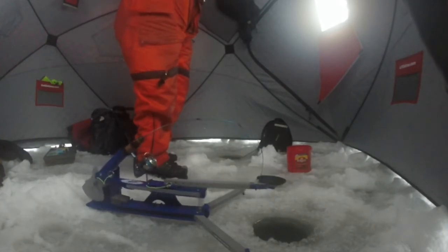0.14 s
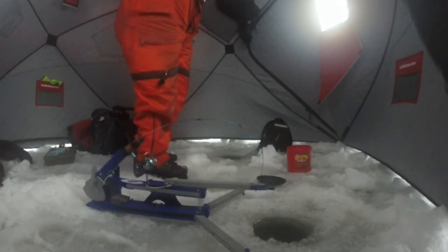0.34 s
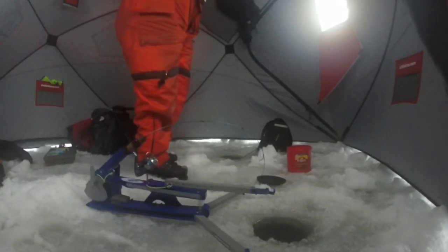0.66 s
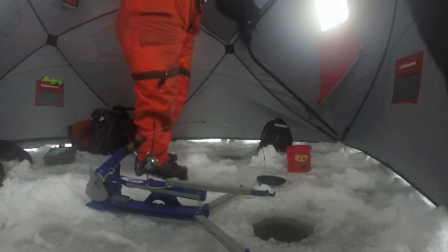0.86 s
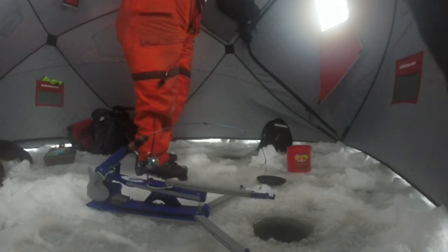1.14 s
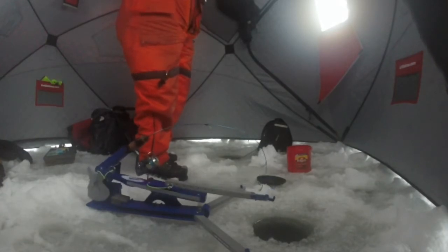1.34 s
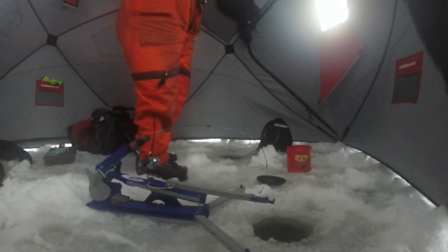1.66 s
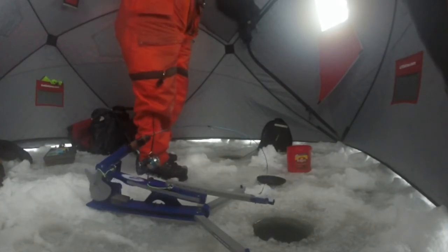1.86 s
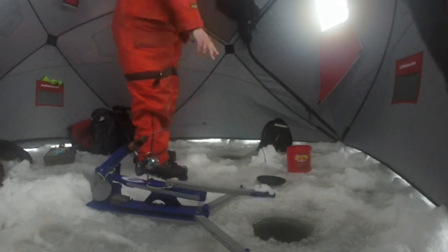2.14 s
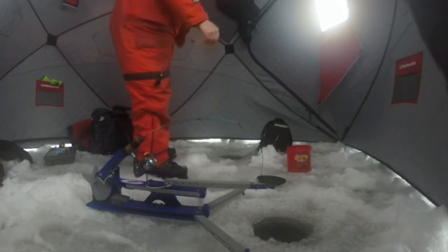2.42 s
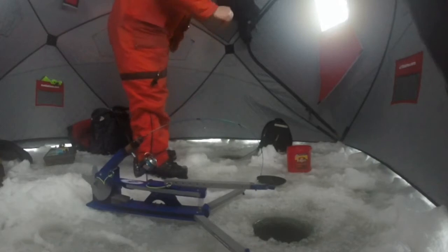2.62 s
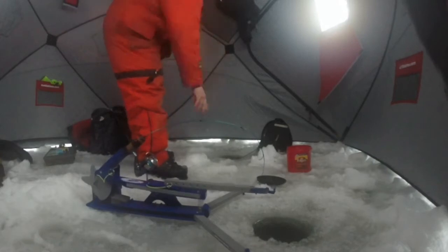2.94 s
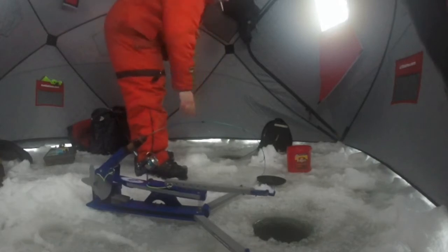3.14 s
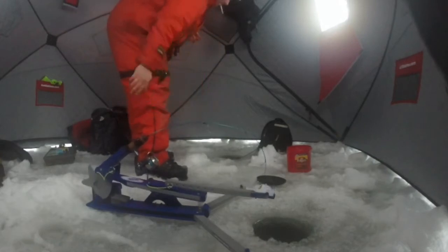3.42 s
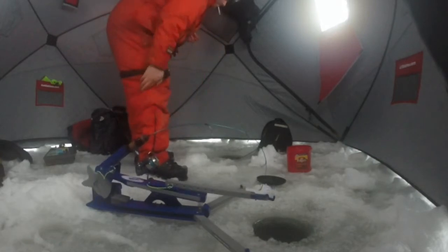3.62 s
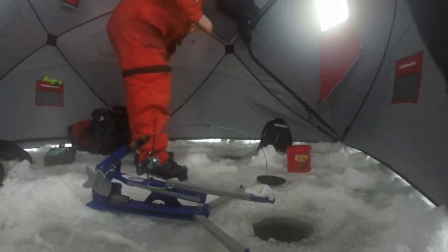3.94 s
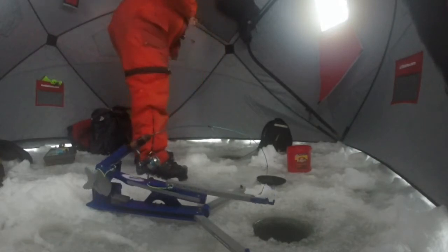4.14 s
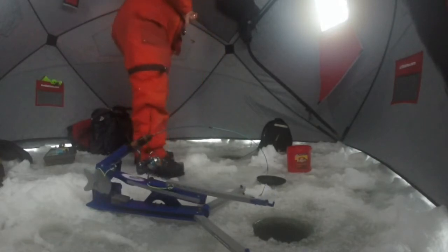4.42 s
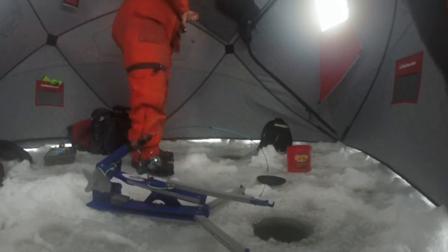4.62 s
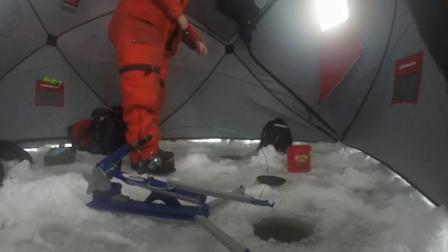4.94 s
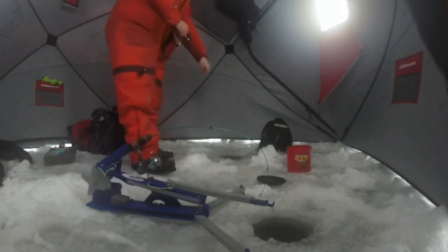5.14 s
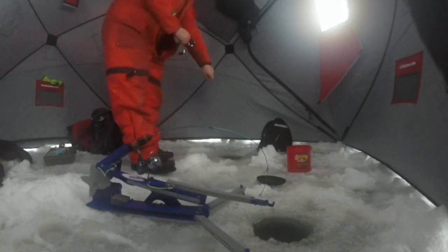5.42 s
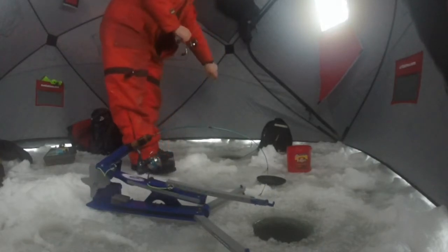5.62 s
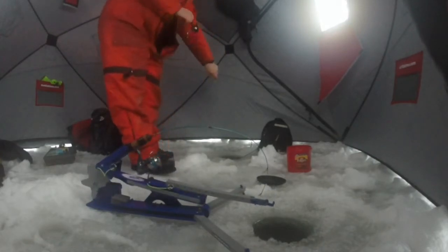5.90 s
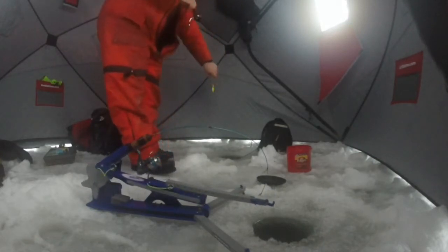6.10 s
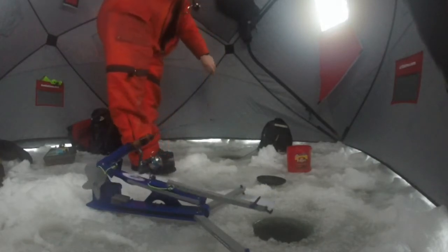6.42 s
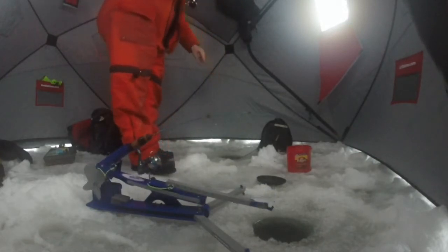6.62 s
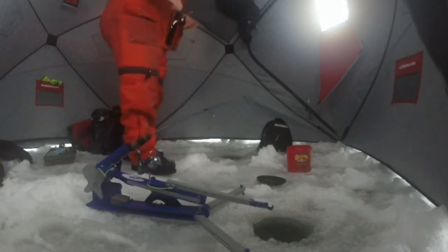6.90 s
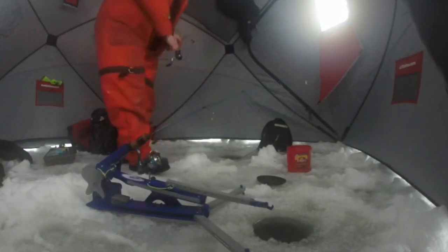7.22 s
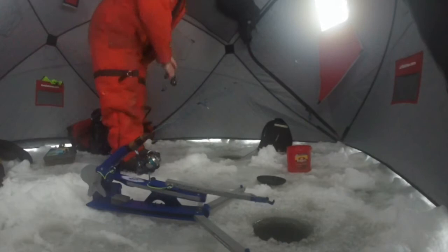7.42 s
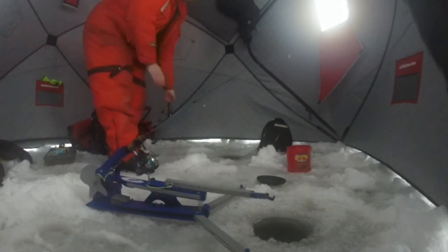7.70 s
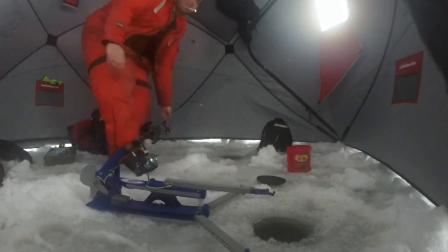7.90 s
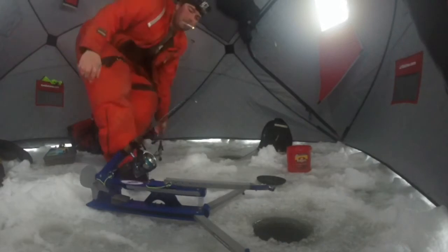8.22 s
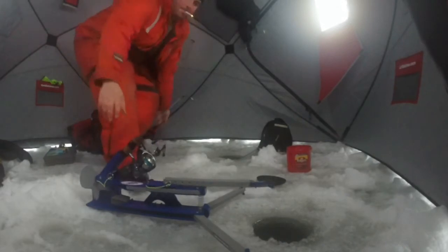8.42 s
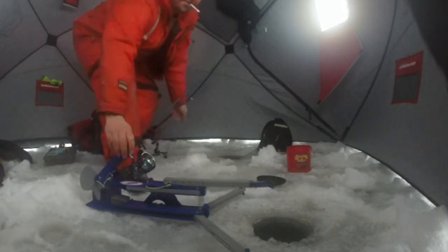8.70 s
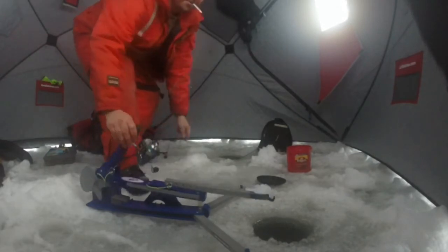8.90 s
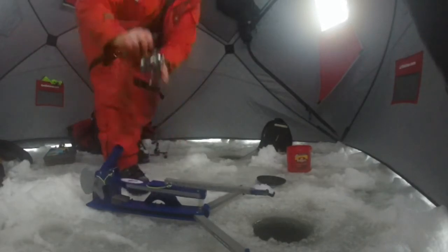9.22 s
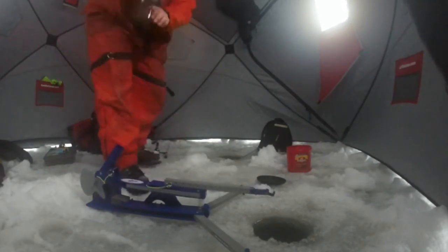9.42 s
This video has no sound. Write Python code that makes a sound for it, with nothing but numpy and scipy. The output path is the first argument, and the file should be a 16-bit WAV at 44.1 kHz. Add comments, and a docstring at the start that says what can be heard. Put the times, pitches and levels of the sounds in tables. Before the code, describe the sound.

Steady rain patters on the taut cloth of a small shelter on ice, a soft broad hiss with fine drops, fluttering slightly and holding nearly level throughout. For 0-2.9 s it is almost alone, with scattered crisp ticks, densest in the first half second. From 2.9 to 3.9 s nylon rubs and slush crunches lightly, ending in low heel booms near 3.8 s. Rain and ticks return. At 6.4 s hard plastic clatters suddenly, with a strong hollow knock at 6.5 s and smaller rattles to 6.7 s. Boots thud and crush slush around 7.0-7.9 s; the suit swishes, sharp snaps hit at 7.6 and 7.9 s, and a very faint high metal ring shimmers. Steps thump at 8.15 s, a knock follows at 8.4 s, then crunching and rustling at 8.5-8.9 s. Hollow plastic clacks land at 9.1 and 9.4 s. Close, dry sound, short soft tail.

```python
"""Steady rain patters on the taut fabric of a small shelter on ice: filtered noise, random grains, ticks.
Hollow knocks sound (decaying modes); boots crush slush, a nylon suit swishes, low thuds fall
(coloured grains under swelling gains); heels boom (decaying sines). Later plastic rattles (chatter
through ringing modes) and a thin metal part rings faintly (beating sines)."""
import sys
import numpy as np
from scipy import signal
from scipy.io import wavfile
from scipy.ndimage import uniform_filter1d

SR = 44100
rng = np.random.default_rng(int(sys.argv[2]) if len(sys.argv) > 2 else 0)


def field_ratio(decibels):
    """Amplitude ratio for a level in dB (20 dB per decade); scalars and array-likes work."""
    return 10 ** (np.asarray(decibels, dtype=float) / 20)


def master(y):
    """Save y as 16-bit WAV."""
    cut = np.clip(np.atleast_2d(y).T, -1, 1)
    pcm = np.round(cut * 32767)  # scale
    wavfile.write(sys.argv[1], SR, pcm.astype(np.int16))


N = 421155
GRID_HZ = np.geomspace(30, 20000, 20)


def evened(x):
    """Scales to rms 1."""
    return x / np.sqrt(np.mean(x ** 2) + 1e-20)


def read(points, hz):
    """Reads a spectrum on a log-frequency axis."""
    point_hz, value = np.transpose(points)
    return np.interp(np.log(hz + 1), np.log(point_hz + 1), value)


def hump(hz, centre_hz, octaves):
    """Bump on the octave scale [dB], down 6 dB at the given octaves from its centre."""
    return -6 * (np.log2((hz + 1) / centre_hz) / octaves) ** 2


def add(mix, start_s, sound):
    """Mixes a sound in at its start time."""
    part = mix[round(start_s * SR):][:len(sound)]
    part += sound[:len(part)]


def coloured(x, points, size=4096):
    """Causal minimum-phase filter with the given spectrum: clicks keep a sharp front."""
    log_gain = np.log(field_ratio(read(points, abs(np.fft.fftfreq(size, 1 / SR)))))
    taps = np.fft.ifft(np.exp(np.conj(signal.hilbert(log_gain)))).real[:size // 2]
    return signal.oaconvolve(x, taps)[:len(x)]


def grains(count, per_s, spread_db, t60_s):
    """Random impacts, a few much larger than the rest, each a short dying puff of noise."""
    size = field_ratio(spread_db * np.minimum(rng.exponential(1, count), 4))
    size *= rng.random(count) < per_s / SR
    fade = field_ratio(-2 * 60 / (max(t60_s, 1e-4) * SR))  # per sample, of power
    envelope = np.sqrt(signal.lfilter([1], [1, -fade], size ** 2))
    return evened(envelope * rng.standard_normal(count))


def wander(seconds):
    """Smooth random drift of rms 1, over the given time: noise averaged twice."""
    width = max(round(seconds * SR), 2)
    return evened(uniform_filter1d(uniform_filter1d(rng.standard_normal(N), width), width))


def bouts(rows):
    """Gain of events that swell to a peak and fade, adding as powers."""
    t, power = np.arange(0, N, 32) / SR, 0
    for peak_s, db, swell_s, fade_s in rows:
        distance = np.maximum((peak_s - t) / max(swell_s, 1e-3), (t - peak_s) / max(fade_s, 1e-3))
        power = power + field_ratio(2 * (db - 20 * distance))
    return np.interp(np.arange(N) / SR, t, np.sqrt(power))


# strength of the shower: (time [s], level [dB])
SHOWER = [(0, -41.5), (.7, -42), (2.3, -42.5), (3.1, -43), (4.6, -42.5), (5.4, -43.1), (6.2, -43.5),
          (7, -42.6), (8.1, -43.5), (9.55, -42)]
# colour of rain on the cloth: (frequency [Hz], density [dB per Hz])
RAIN_COLOUR = [(15, -39), (25, 0), (48, 0.5), (241, -5), (437, 0), (572, -1), (620, -2.5), (834, -2.5),
               (1040, -5), (1820, -2.5), (4450, -2.5), (6140, -6.5), (13400, -23.5), (15800, -28)]
# patches of cloth, the last one sparse and crisp: (centre [Hz], level [dB], drops [per s], t60 [s])
PATCHES = [(430, -1.5, 90, 0.039), (1890, -1, 400, 0.016), (4480, -1.5, 420, 0.015),
           (11000, -1.5, 320, 0.016), (3630, -13.5, 44, 0.001)]


def rain():
    """Far drops merge to a hiss; nearer ones patter apart, each patch of cloth at its own pitch."""
    time_s, shower_db = np.transpose(SHOWER)
    flutter = field_ratio(2.1 * np.tanh(wander(.026)))  # quick and random, by up to 2.1 dB
    patter = np.zeros(N)
    for centre_hz, db, per_s, t60_s in PATCHES:
        patch = np.transpose([GRID_HZ, np.maximum(hump(GRID_HZ, centre_hz, octaves=1.0), -60)])
        patter += field_ratio(db) * coloured(grains(N, per_s, 3.5, t60_s), patch)
    hiss = field_ratio(0.5) * rng.standard_normal(N)
    cloth = evened(coloured(hiss + patter * flutter, RAIN_COLOUR))
    return cloth * field_ratio(np.interp(np.arange(N) / SR, time_s, shower_db) + .5 * wander(0.025))


# sharp ticks, large drops or snaps: (time [s], peak [dB], pitch [Hz])
TICKS = [(0.015, -26, 2900), (0.167, -24.5, 3940), (0.208, -24, 4410), (0.267, -26, 3000),
         (0.3904, -24, 4140), (0.5233, -25, 3220), (0.9875, -26, 3350), (1.04, -25, 1490),
         (1.0653, -29, 900), (1.7549, -25, 4880), (2.217, -32, 480), (2.3436, -27, 4000),
         (2.3876, -24.5, 3200), (2.621, -26, 2750), (2.7498, -30, 1670), (3.247, -32, 2200),
         (3.689, -28, 3340), (4.3703, -22, 3320), (4.6241, -26, 3300), (4.68, -25, 2800),
         (4.887, -29, 4000), (5.1655, -30, 3300), (5.315, -30, 3000), (5.418, -29, 1750),
         (5.9748, -26.5, 2800), (7.4883, -30, 4800), (7.5962, -19, 4300), (7.8682, -20, 4150),
         (8.353, -27.5, 4000), (8.882, -27, 2900), (8.947, -28, 3800)]


def ticks():
    """A large drop or a snap is a sharp tick, with a brief spatter at its own pitch."""
    out, t = np.zeros(N), np.arange(1500) / SR
    spatter_t60_s = .016
    for start_s, db, hz in TICKS:
        spot = read(RAIN_COLOUR, GRID_HZ) + np.maximum(hump(GRID_HZ, hz, octaves=1.14), -40)
        spatter = 0.18 * rng.standard_normal(len(t)) * field_ratio(-60 * t / spatter_t60_s)
        tick = coloured((t == 0) + spatter, np.transpose([GRID_HZ, spot]))
        add(out, start_s, field_ratio(db) * tick / abs(tick).max())
    return out


# hollow knocks; the first, at 0.294 s, is a drop on slack cloth:
# (time [s], level [dB], main mode [Hz], t60 [s])
KNOCKS = [(0.294, -38, 420, 0.048), (3.228, -36, 1160, .03), (6.521, -15, 328, 0.016),
          (6.541, -22.5, 460, 0.017), (6.633, -27, 325, 0.039), (6.643, -24, 400, 0.018),
          (7.405, -33, 384, 0.053), (7.604, -31, 345, 0.085), (7.918, -33, 430, 0.067),
          (7.929, -31.5, 436, 0.08), (8.3793, -23, 383, 0.032), (9.1, -16, 382, 0.018),
          (9.121, -27, 422, 0.032), (9.385, -20.5, 390, 0.029)]
# modes of a hollow knock: (multiple of the main mode, level [dB])
HOLLOW = [(.8, -9), (1.001, 18.5), (1.2, 6.5), (1.38, -9)]


def knocks():
    """A hollow knock, or a drop on slack cloth, rings in a few close modes with a buzz after them."""
    out, t = np.zeros(N), np.arange(SR // 4) / SR
    for start_s, db, hz, t60_s in KNOCKS:
        ring = sum(field_ratio(mode_db) * np.sin(2 * np.pi * hz * k * t) for k, mode_db in HOLLOW)
        ring *= field_ratio(-60 * t / max(t60_s, .01)) * np.minimum(t / 0.0026, 1)
        buzz = rng.standard_normal(len(t)) * field_ratio(-60 * t / 0.2) * (t > .004)
        buzz /= np.linalg.norm(buzz)
        knock = ring + field_ratio(-8.5) * signal.fftconvolve(ring, buzz)[:len(t)]
        add(out, start_s, field_ratio(db) * knock / abs(ring).max())
    no_bass = signal.butter(4, 265, "high", fs=SR, output="sos")  # small bodies have no deep bass
    return signal.sosfilt(no_bass, out)


# slush crushed under a sole: (peak time [s], level [dB], 20 dB swell [s], 20 dB fade [s])
CRUSHES = [(2.95, -49, 0.31, 0.59), (3.234, -42, 0.022, 0.035), (3.356, -41.5, .015, .07),
           (3.626, -47, 0.25, .03), (3.735, -42.5, 0.037, 0.16), (3.814, -40, 0.15, 0.053),
           (7.028, -37.5, 0.02, 0.069), (7.16, -48, .4, 0.69), (7.315, -42, .02, 0.032),
           (7.402, -38.5, 0.024, 0.27), (7.604, -37, 0.037, 0.1), (7.796, -44.5, .08, 0.36),
           (8.14, -39.5, 0.0036, .04), (8.168, -37.5, 0.017, 0.08), (8.208, -41, .02, .05),
           (8.382, -41, 0.03, 0.17), (8.532, -45, 0.22, 0.12), (8.645, -44, .02, .1),
           (8.669, -37, 0.014, 0.03), (8.695, -41, .02, .03), (8.736, -37, .04, .015),
           (8.8, -35.5, .1, 0.18), (8.84, -37.5, 0.11, 0.065), (9.104, -40, 0.016, 0.23),
           (9.384, -42, 0.007, 0.32)]
# colour of crushed slush: (frequency [Hz], gain [dB])
CRUNCH_COLOUR = [(300, -18), (1000, -17), (1300, -5), (1550, -4), (1850, -4), (2300, -14.5), (3200, -10.5),
                 (5000, -25.5), (9000, -33)]


def slush():
    """Slush crushes under the soles in dense grains."""
    crunch = grains(N, per_s=1300, spread_db=2.2, t60_s=.012)
    return bouts(CRUSHES) * evened(coloured(crunch, CRUNCH_COLOUR))


# nylon rubbing on nylon: (peak time [s], level [dB], 20 dB swell [s], 20 dB fade [s])
RUBS = [(2.962, -46, 0.26, 0.29), (3.228, -45, 0.06, .35), (3.385, -45, 0.14, 0.11),
        (3.814, -38, 0.32, 0.06), (7.028, -45, .04, 0.11), (7.385, -39, 0.28, 0.28),
        (7.566, -37.5, 0.021, .055), (7.604, -35.5, 0.023, 0.13), (7.85, -46.5, 0.6, 0.36),
        (8.14, -42.5, .01, 0.55), (8.603, -35, .025, 0.022), (8.668, -42.5, 0.18, 0.11),
        (8.834, -39, 0.069, 0.098), (9.296, -41, 0.077, 0.052), (9.49, -47.5, 0.51, .5)]
# colour of rubbed nylon: (frequency [Hz], gain [dB])
SWISH_COLOUR = [(500, 0), (2000, -2.5), (5000, -1.5), (9000, -10), (12000, -12), (16000, -21)]


def nylon():
    """Nylon rubs on nylon in fine grains that blur to a swish."""
    swish = grains(N, per_s=1600, spread_db=2.6, t60_s=0.012)
    return bouts(RUBS) * evened(coloured(swish, SWISH_COLOUR))


# low thuds: weight on the boots, and the low body of the rattle's first strike:
# (peak time [s], level [dB], 20 dB swell [s], 20 dB fade [s])
THUDS = [(2.962, -50.5, .08, 0.51), (3.63, -45.5, 0.089, 0.078), (3.77, -42, 0.11, 0.1),
         (3.82, -42, 0.1, 0.064), (6.39, -42, 0.013, 0.26), (6.64, -38, 0.046, 0.073),
         (6.75, -45.5, 0.052, 0.048), (7.028, -36.5, 0.037, 0.036), (7.102, -45.5, 0.04, 0.29),
         (7.566, -42.5, 0.081, .1), (7.604, -38, 0.077, 0.043), (8.15, -42, .02, .1),
         (8.532, -46, 0.13, 0.064), (8.834, -43.5, 0.11, 0.064)]
# colour of a low thud: (frequency [Hz], gain [dB])
THUD_COLOUR = [(30, -17), (70, -18), (160, 0.5), (250, -4.5), (420, -2.5), (700, -13), (1200, -17.5),
               (3000, -54)]


def thuds():
    """Weight on the boots, and the low body of the rattle's first strike, thud in low grains."""
    thud = evened(coloured(grains(N, per_s=540, spread_db=2.5, t60_s=0.023), THUD_COLOUR))
    # random grains levelled over short windows, so each thud keeps its stated level
    thud /= np.sqrt(uniform_filter1d(thud ** 2, size=1500) + .1)
    return bouts(THUDS) * thud


# heel thumps: (time [s], level [dB], pitch [Hz], t60 [s])
THUMPS = [(3.749, -33, 200, 0.063), (3.763, -38, 141, 0.092), (3.792, -31, 141, 0.066),
          (3.8023, -24.5, 180, .07), (8.138, -31, 262, 0.028), (8.167, -34, 150, 0.027),
          (8.175, -29, 220, .025), (8.198, -32, 253, .03)]


def thumps():
    """A heel coming down sets the ice slab and boot sole booming for a few cycles."""
    out, t = np.zeros(N), np.arange(SR // 5) / SR
    for start_s, db, hz, t60_s in THUMPS:
        boom = np.sin(2 * np.pi * hz * t) + field_ratio(-9) * np.sin(2 * np.pi * 2.27 * hz * t)
        envelope = field_ratio(db - 60 * t / max(t60_s, .01)) * np.minimum(t / 0.0017, 1)
        add(out, start_s, envelope * boom)
    return out


# bouts of rattling: (time [s], level [dB], fall by 60 dB [s], favoured mode [Hz], crack re level [dB])
RATTLES = [(6.359, -37.5, 0.094, 3400, -12), (6.3787, -17, 0.054, 3180, -10), (6.39, -19, 0.03, 3210, -0.5),
           (6.399, -23, 0.084, 3000, -5.5), (6.405, -25.5, 0.084, 1900, -6),
           (6.448, -24.5, 0.024, 2750, -10), (6.456, -27, 0.022, 2790, -12), (6.463, -30.5, .1, 1900, -14),
           (6.479, -34, 0.11, 2750, -7), (6.507, -32.5, 0.12, 2750, -11), (6.521, -28.5, 0.029, 3060, 0),
           (6.524, -23.5, 0.035, 1850, -18), (6.534, -27, 0.13, 1830, -12), (6.561, -32.5, 0.08, 2750, -12),
           (6.59, -33.5, 0.057, 2750, -9), (6.604, -29.5, .05, 2770, -11), (6.629, -33, 0.088, 2800, -8),
           (6.647, -35, 0.16, 1760, -9), (6.69, -30, 0.017, 2770, -7), (6.695, -40, 0.12, 2470, -2),
           (7.605, -31.5, 0.023, 3480, 5), (8.4115, -33.5, 0.025, 2750, -16), (8.419, -41, 0.15, 1900, -5),
           (8.454, -41, 0.044, 2750, -8), (8.511, -41, 0.091, 1760, -11), (9.1, -28.5, 0.068, 3050, -4.5),
           (9.102, -26.5, 0.09, 1820, -16), (9.112, -31, 0.017, 3060, -10), (9.14, -26, 0.023, 2660, -16),
           (9.147, -35.5, 0.15, 1830, -21), (9.153, -34, .09, 2750, -17), (9.187, -36, 0.041, 3020, -14),
           (9.215, -38, 0.064, 3080, -5), (9.384, -29.5, 0.064, 1780, -13), (9.411, -37.5, 0.14, 2800, -10),
           (9.386, -36, 0.05, 4500, -12)]
# modes of the plastic: (frequency [Hz], level [dB], t60 [s])
PLASTIC = [(1390, -5, .008), (1760, -12.5, 0.016), (1900, 3, 0.02), (2110, 2, 0.01), (2470, 2, 0.0096),
           (2750, 4.5, 0.017), (3106, 3.5, 0.027), (3400, 2.5, 0.026), (3720, -2, 0.012),
           (4500, 0.5, 0.0093), (4840, -12.5, 0.0093)]
# colour of the bare contact crack: (frequency [Hz], gain [dB])
CRACK_COLOUR = [(60, -99), (400, 1), (1100, 1.5), (2000, -1), (4500, 9), (7000, 1.5), (11000, -9),
                (16000, -19)]


def rattle():
    """Loose parts chatter against plastic; each bout favours the modes near the spot it strikes."""
    out, t = np.zeros(N), np.arange(SR // 3) / SR
    ring_t = t[:2000]
    clink_rise_s, firm_s = 0.0019, .045  # bouts up to firm_s start with a full clink
    thin_wall = signal.butter(3, 1300, "high", fs=SR, output="sos")  # small parts radiate no bass
    for start_s, db, length_s, spot_hz, crack_db in RATTLES:
        length_s = max(length_s, .01)
        fall = field_ratio(-60 * (t / length_s) ** 2)  # holds, then stops short
        contact = 1.5 * np.exp(-t / 0.0024) * rng.standard_normal(len(t))  # first contact is hardest
        chatter = contact + grains(len(t), per_s=2200, spread_db=1.7, t60_s=0.004)
        chatter *= fall * np.minimum(t / 0.0013, 1)
        chatter /= np.sqrt(np.sum(chatter ** 2) / np.sum(fall ** 2))
        body = np.zeros(len(ring_t))
        for hz, mode_db, t60_s in PLASTIC:
            gain_db = mode_db + max(hump(hz, spot_hz, octaves=0.17), -11)
            grip = 1 + .035 * rng.uniform(-1, 1)  # the grip detunes each mode a little
            body += field_ratio(gain_db - 60 * ring_t / t60_s) * np.sin(2 * np.pi * hz * grip * ring_t)
        tone = signal.fftconvolve(chatter, body / np.linalg.norm(body))[:len(t)]
        clink = t / clink_rise_s * np.exp(1 - t / clink_rise_s) * np.sin(2 * np.pi * spot_hz * t)
        firmness = min(firm_s / length_s, 1) ** 2  # a short bout is one firm blow
        tone = signal.sosfilt(thin_wall, tone) + 1.34 * firmness * clink
        crack = field_ratio(crack_db) * coloured(chatter, CRACK_COLOUR)
        add(out, start_s, field_ratio(db) * (tone + crack))
    return out


# faint metal pings: (time [s], pitch [Hz], level [dB], rise [s], t60 [s])
PINGS = [(7.6, 14010, -56, .06, .7), (7.72, 12840, -53, .05, .5)]


def pings():
    """A thin wire part rings near the top of hearing, beating at 31 Hz with close modes."""
    out, t = np.zeros(N), np.arange(SR // 2) / SR
    beat = 1 + 0.34 * np.cos(2 * np.pi * 31 * t)
    for start_s, hz, db, rise_s, t60_s in PINGS:
        envelope = field_ratio(db - 60 * t / t60_s) * np.minimum(t / rise_s, 1)
        add(out, start_s, envelope * np.sin(2 * np.pi * hz * t) * beat)
    return out


def shelter(x, wet_db, t60_s):
    """Cloth walls return a short soft tail: convolution with decaying noise."""
    t = np.arange(SR // 4) / SR
    tail = rng.standard_normal(len(t)) * field_ratio(-60 * t / t60_s) * (t > .003)
    return x + field_ratio(wet_db) * signal.oaconvolve(x, tail / np.linalg.norm(tail))[:N]


def scene():
    """Rain, slush, nylon and thuds dry; ticks, knocks, thumps, rattle and pings with the shelter's tail."""
    near = ticks() + knocks() + thumps() + rattle() + pings()
    dull = slush() + nylon() + thuds()
    return (rain() + dull + shelter(near, wet_db=-10, t60_s=0.1))[None]


def top_cut(x):
    """Nothing passes above the cut-off."""
    return signal.sosfilt(signal.butter(12, 16210, fs=SR, output="sos"), x)


def record(dry):
    """Limits the band with a steep linear-phase low-pass."""
    edge_hz = 16150
    edge = signal.firwin(511, edge_hz, window=("kaiser", 9), fs=SR)
    mix = signal.oaconvolve(dry, edge[None], "same")
    return top_cut(mix)


dry = scene()
out = record(dry)
master(out)
```